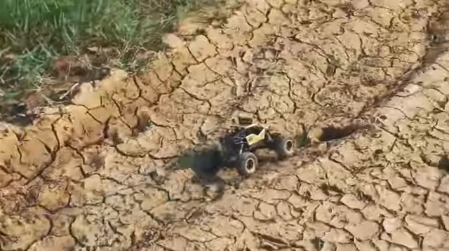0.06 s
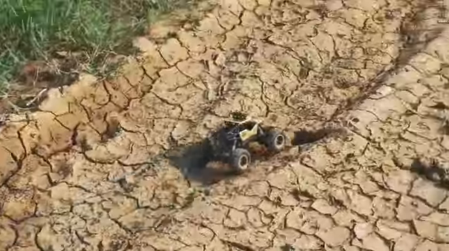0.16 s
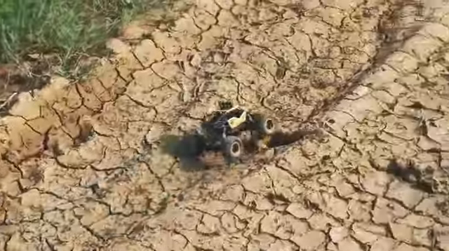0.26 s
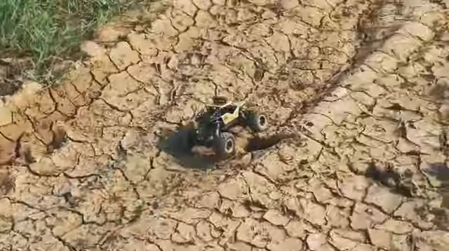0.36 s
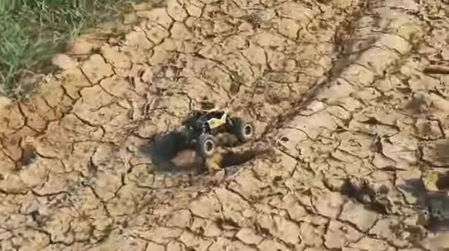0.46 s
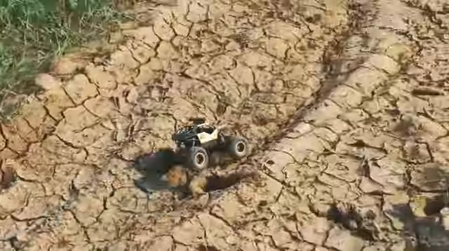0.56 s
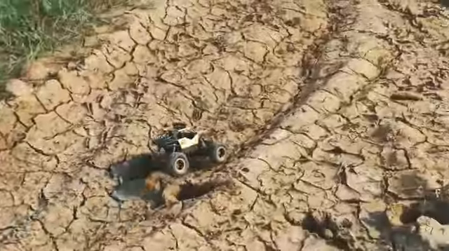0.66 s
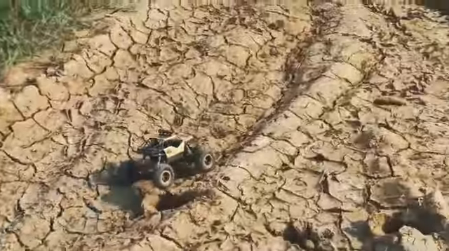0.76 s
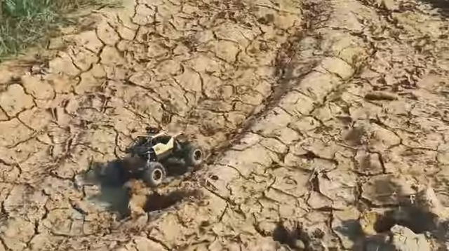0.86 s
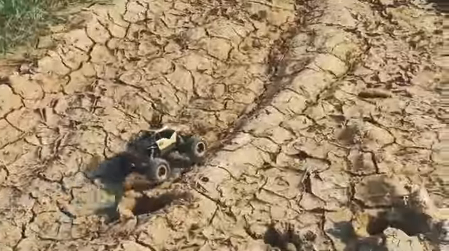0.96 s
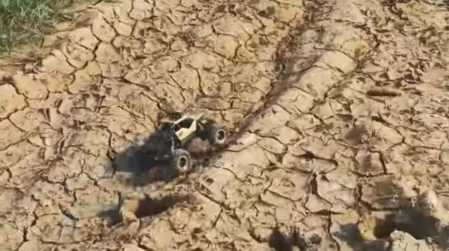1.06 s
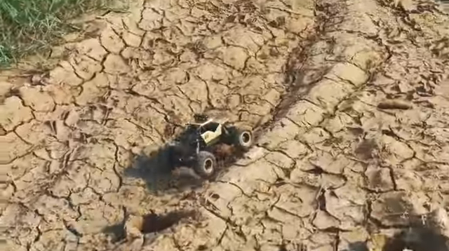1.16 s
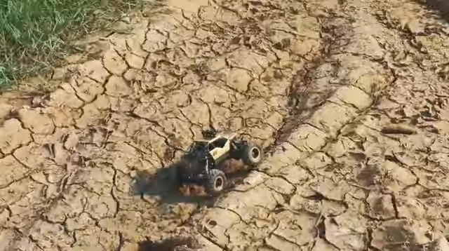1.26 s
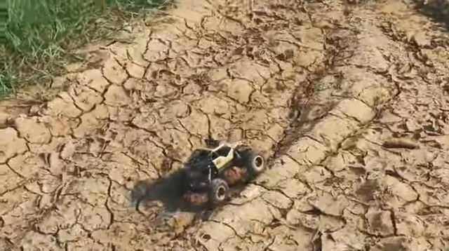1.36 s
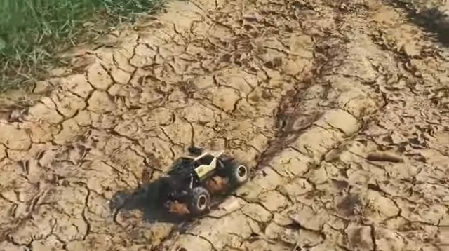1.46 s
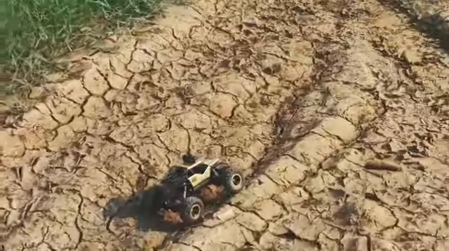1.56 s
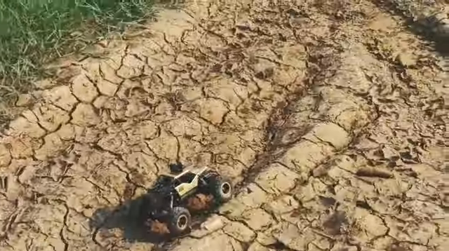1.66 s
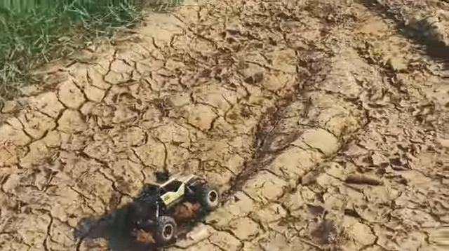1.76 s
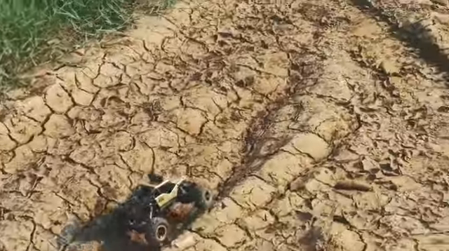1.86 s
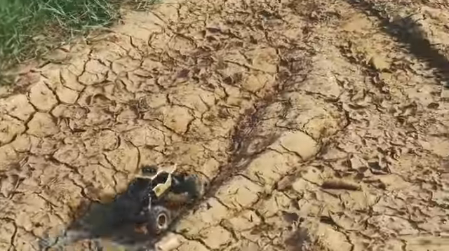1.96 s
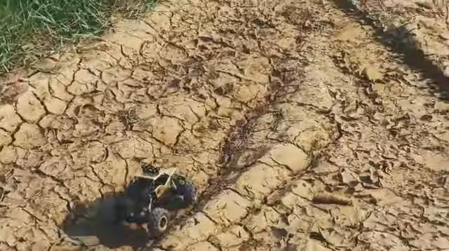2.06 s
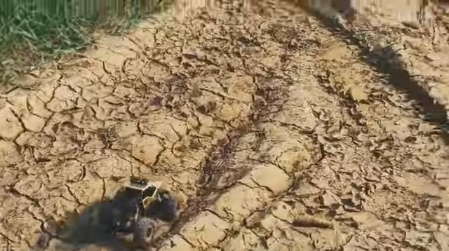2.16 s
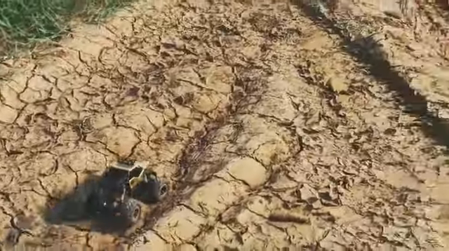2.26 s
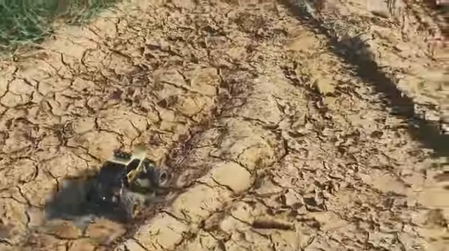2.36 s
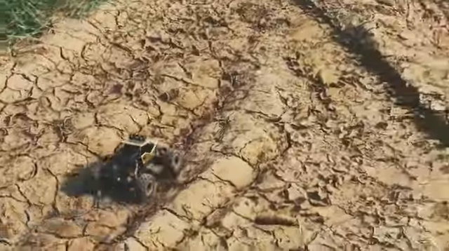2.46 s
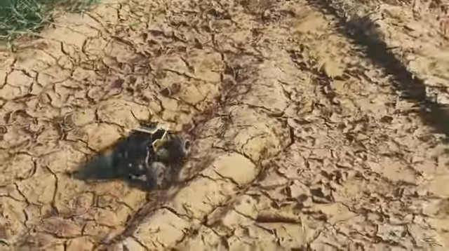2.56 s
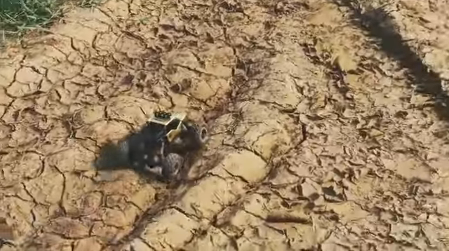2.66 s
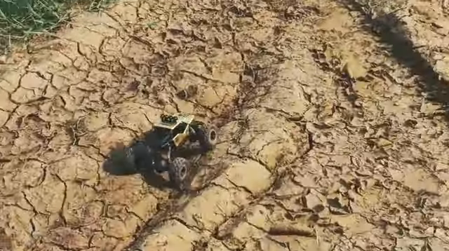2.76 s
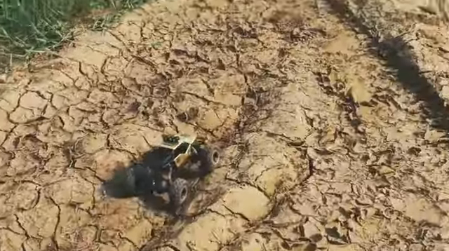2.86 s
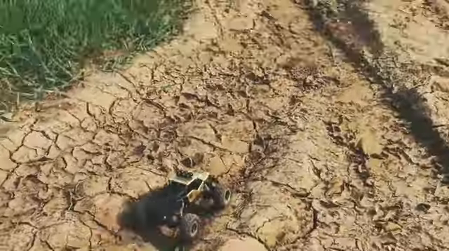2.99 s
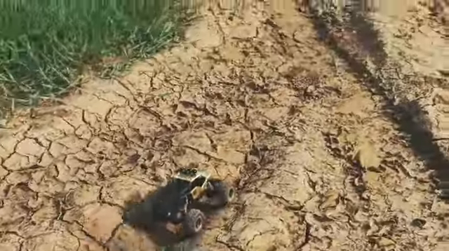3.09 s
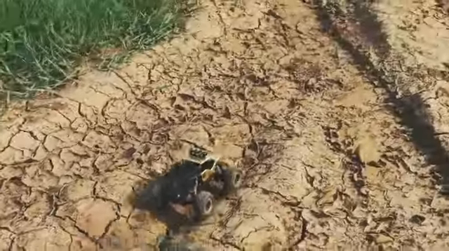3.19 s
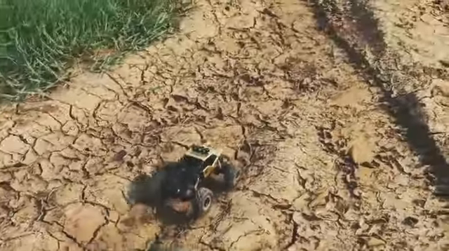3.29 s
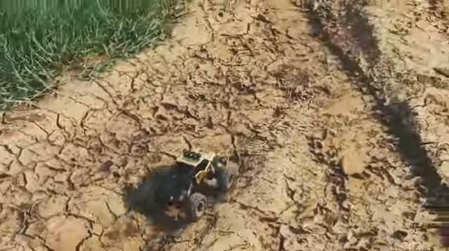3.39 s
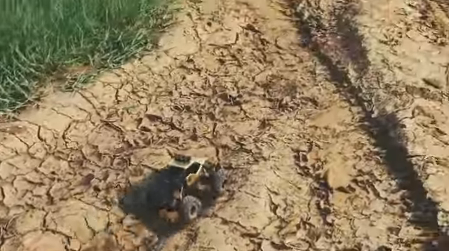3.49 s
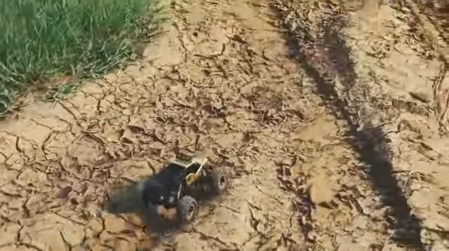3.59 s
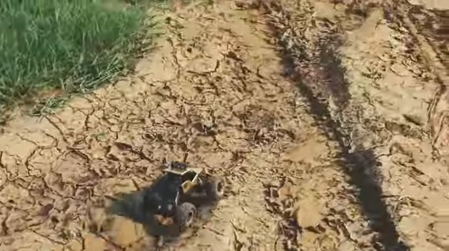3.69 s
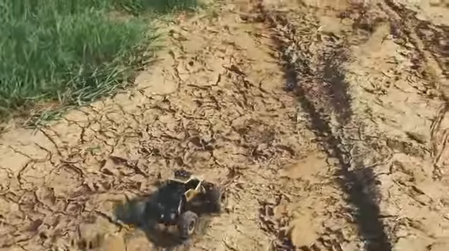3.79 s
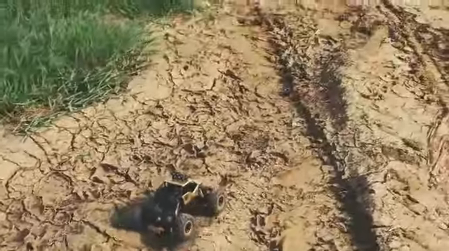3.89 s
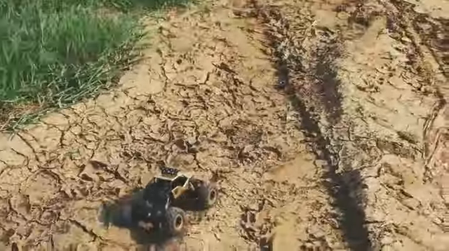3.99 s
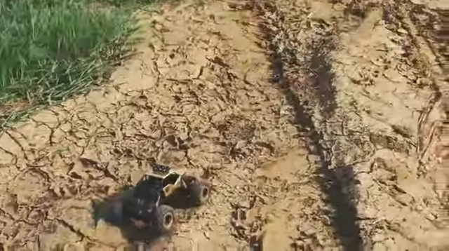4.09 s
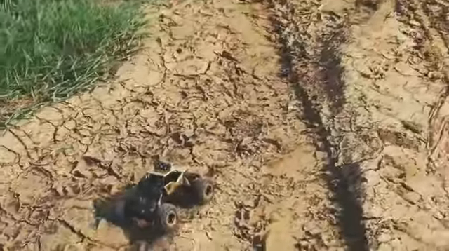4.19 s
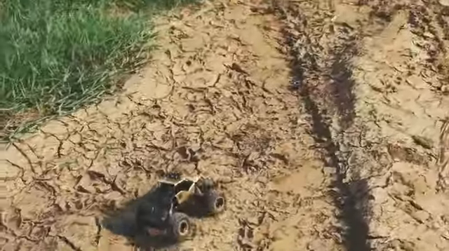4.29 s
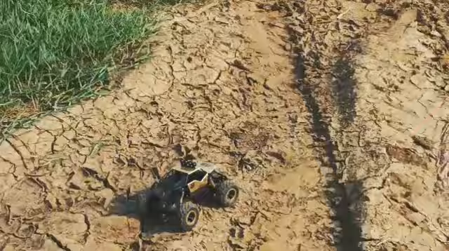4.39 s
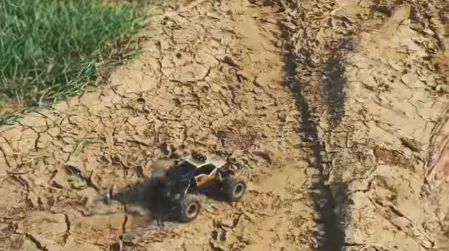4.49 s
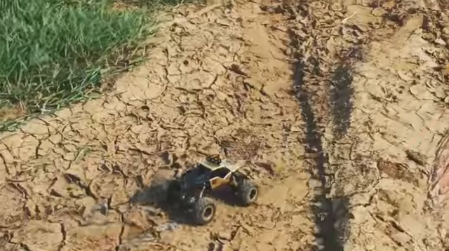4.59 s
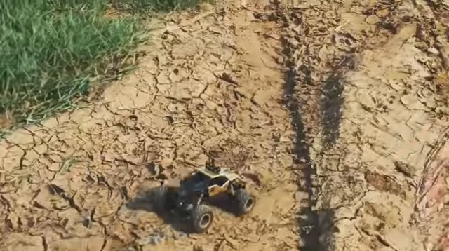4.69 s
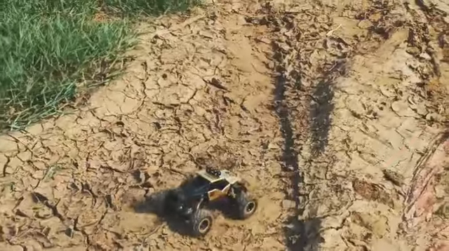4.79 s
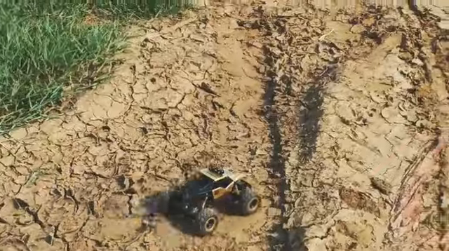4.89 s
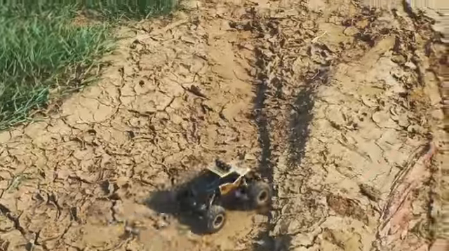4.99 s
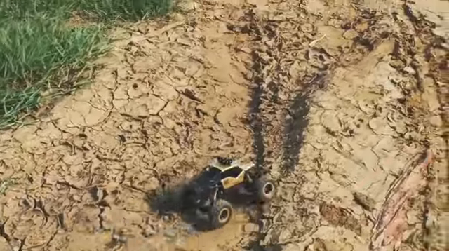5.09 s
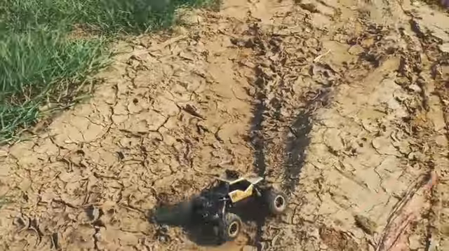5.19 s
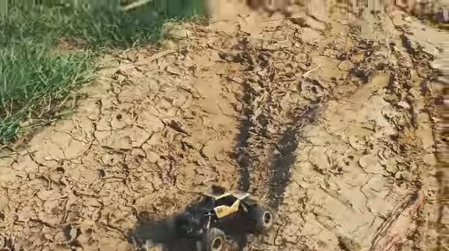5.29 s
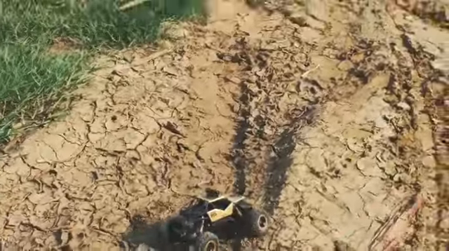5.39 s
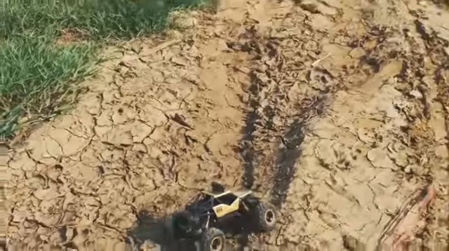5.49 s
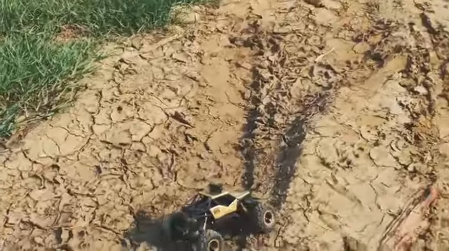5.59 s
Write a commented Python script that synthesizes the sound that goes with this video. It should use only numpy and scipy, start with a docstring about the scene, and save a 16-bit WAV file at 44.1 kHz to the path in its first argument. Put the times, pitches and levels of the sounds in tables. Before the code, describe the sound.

In quiet open air with no echo, a small toy truck starts with soft, dry plastic gear chatter, a brief whine and light shell knocks in the first half second. From 0.6 to 1.8 s there are weak, separated throttle pushes with faint crust clicks. At about 1.8 s the gears spin up again, stronger by 2.1 s, with a low tread groan, gritty scrubbing and a distinct crack near 2.4 s. Short bursts follow at 2.9 and 3.4 s, their mid-high whines gliding up and down, with snaps around 3 s and a rough rattle near 3.7 s. A low groan comes at 3.85 s. From 4.2 s the buzzing is loudest, grinding and shrill, with many snaps and hollow body knocks up to a hard clack at 5.15 s. One loud dull pop hits at 5.27 s, then a tiny hoarse skid, a thud and last small snaps.

```python
"""Plastic gears chatter first: a toy remote-control truck creeps in stop-start bursts over dry cracked mud.
The gears are motor ticks and random clicks ringing a case; short gliding tones make their whine.
The body shell is a set of resonances that rattles and knocks. The tyres are coloured clicks that scrub,
with dull bumps and a hoarse squeak. Crumbs of mud snap as short pulses with a bright crack.
Shaped noise makes a quiet open-air background."""
import sys
import numpy as np
from scipy import signal
from scipy.fft import rfft, irfft
from scipy.io import wavfile
from scipy.ndimage import uniform_filter1d

SR = 44100
rng = np.random.default_rng(int(sys.argv[2]) if len(sys.argv) > 2 else 0)


def dump(signal):
    """Clip the signal to [-1, 1] and save it as 16-bit WAV at the path in sys.argv[1]."""
    limited = np.clip(np.atleast_2d(signal).T, -1, 1)
    pcm = np.round(limited * 32767).astype(np.int16)
    wavfile.write(sys.argv[1], SR, pcm)


N = 249165

# Pushes of the throttle, from a creep to a lunge; the level is the gear drive at the start, before sag
# [start_s, length_s, spin_up_s, level_db]
THROTTLE_PUSHES = [(-.06, 0.42, 0.17, -45), (0.408, 0.2, 0.012, -51.5), (0.83, 0.22, 0.16, -45.5),
                   (1.061, 0.13, 0.038, -48.5), (1.207, 0.14, 0.018, -52.5), (1.798, 0.71, 0.13, -44.5),
                   (2.07, 0.38, .13, -38), (2.478, 0.031, 0.0038, -38.5), (2.903, 0.31, 0.12, -41.5),
                   (3.275, 0.027, 0.027, -48), (3.391, 0.45, 0.14, -40), (4.213, 0.25, 0.15, -35),
                   (4.552, 0.073, 0.0082, -46.5), (4.775, 0.4, 0.048, -36.5), (5.199, 0.066, 0.022, -44)]
COAST_S, SAG_DB_PER_S = 0.06, -9.5  # gears run down after each push, and ease off a little during it
IDLE_DB = -66  # gear drive while the truck barely rolls
MESH_TEETH = 4  # gear teeth that meet in one motor turn

# Gears bind under load and grind brightly [start_s, length_s, level_db]
GEAR_GRINDS = [(.212, 0.068, -54), (.32, 0.034, -49), (.378, 0.0094, -44), (.44, 0.038, -52.5),
               (.96, 0.067, -47), (1.9, 0.061, -51.5), (2.208, 0.025, -43), (3.44, 0.103, -50),
               (4.372, 0.091, -42), (4.825, 0.078, -45.5), (4.928, 0.039, -42.5), (5.035, 0.025, -40),
               (5.1, 0.019, -50)]
GRIND_ATTACK_S, GRIND_RELEASE_S = 0.0068, 0.0029

# Resonances, with levels relative to each other [pitch_hz, width_hz, level_db]:
# the gear case
CASE_MODES = [(1600, 240, 2), (2100, 58, 3.5), (2362, 225, 3), (2950, 94, 7), (3306, 87, 0),
              (3885, 154, -6), (5000, 350, -12.5)]
# the thin rasp of the teeth
RASP_MODES = [(7200, 2900, -3), (8650, 880, -12), (13600, 960, -7.5)]
# the strained gears
STRAIN_MODES = [(2740, 480, -7), (3900, 160, -2.5)]
# the higher shriek of gears that bind hard
SHRIEK_MODES = [(5030, 220, -1.5), (5470, 170, -1.5)]
# the body shell
SHELL_MODES = [(798, 70, 7), (934, 85, -2.5), (1320, 500, -10.5)]

# Gliding tones; the level is that of the main tone before its flutter
# [start_s, length_s, start_pitch_hz, end_pitch_hz, level_db]:
# the gear mesh sings for a moment
MESH_WHINES = [(0.214, 0.038, 2798, 2711, -48.5), (0.262, 0.019, 2860, 2558, -34),
               (0.649, 0.103, 2378, 2715, -56), (0.918, 0.0682, 2666, 3029, -47),
               (2.258, 0.039, 2618, 2413, -39), (2.321, 0.035, 2656, 2386, -33.5),
               (2.698, 0.0867, 2123, 2060, -51.5), (3.019, 0.062, 2768, 3257, -44),
               (3.088, 0.026, 4047, 3254, -42.5), (3.312, 0.022, 3005, 2300, -39),
               (3.424, 0.074, 2380, 3457, -39), (3.51, .026, 3592, 2500, -38),
               (3.769, 0.015, 3310, 2709, -34.5), (4.362, 0.078, 2616, 3733, -41),
               (4.432, 0.05, 2124, 2239, -40), (4.799, 0.034, 3056, 3450, -34),
               (4.857, 0.054, 4020, 4125, -40), (5.285, 0.05, 3302, 3128, -48),
               (5.56, 0.12, 2315, 2290, -56)]
# the tread judders on the crust with a low groan
TREAD_GROANS = [(2.0, 0.2174, 447.7, 386.7, -48), (3.835, 0.1116, 372, 452.5, -40)]
# a tyre skids with a hoarse, falling squeak
TYRE_SKIDS = [(5.415, 0.058, 1840, 1405, -48)]

# Rough patches that set the loose shell rattling [start_s, length_s, level_db]
SHELL_RATTLES = [(.212, 0.07, -39.5), (.44, 0.047, -41.5), (1.14, 0.053, -44), (1.915, 0.15, -50.5),
                 (2.225, 0.23, -45.5), (2.482, 0.14, -45.5), (2.785, 0.13, -54.5), (3.18, 0.13, -44),
                 (3.635, 0.044, -37), (3.732, 0.08, -38.5), (4.332, 0.032, -33.5), (4.468, 0.35, -43.5),
                 (4.925, 0.03, -33.5), (5.04, 0.048, -33.5), (5.145, 0.11, -37.5)]
RATTLE_ATTACK_S, RATTLE_RELEASE_S = 0.0036, 0.014
# A wheel slips and scrubs over the crust [start_s, length_s, level_db]
WHEEL_SCRUBS = [(2.15, 0.16, -45), (2.38, 0.06, -38.5), (3.17, 0.061, -44), (3.63, 0.34, -50),
                (4.32, 0.051, -45), (4.985, 0.036, -43.5), (5.14, 0.035, -50)]
SCRUB_ATTACK_S, SCRUB_RELEASE_S = 0.013, 0.012
SHELL_FOLLOW_DB, TYRE_FOLLOW_DB = -2.5, -14  # shell and tyres on even ground, relative to the gear drive
JUDDER_TYRE_DB = -11  # a rough patch also shakes the tyres, relative to the shell

# Jolts that ring the body shell [start_s, peak_db]
SHELL_JOLTS = [(.329, -26.5), (.343, -30), (.433, -33), (2.48, -30), (4.468, -23), (4.534, -28.5),
               (4.567, -28), (4.591, -23), (4.657, -28.5), (4.696, -29.5), (4.742, -24.5), (4.977, -17.5),
               (5.001, -22), (5.037, -29), (5.146, -26), (5.152, -13.5)]
# A soft tyre drops onto the crust [start_s, peak_db]
TYRE_THUDS = [(0.816, -41), (1.656, -42), (2.42, -39), (4.361, -35), (5.003, -28), (5.406, -35.5)]
# Dry snaps of mud crust and stones under the wheels; treble is the crack against the pulse, before CRACK_DB
# [start_s, peak_db, pitch_hz, treble_db]
CRUST_SNAPS = [(.577, -30, 890, -5.5), (0.818, -31.5, 1100, -19), (.842, -32.5, 1330, -24),
               (1.233, -33.5, 2080, 6), (1.46, -33, 1050, 7), (1.596, -36, 666, -23),
               (1.655, -32, 1470, -9), (2.423, -20, 416, 2), (2.905, -35, 1486, 13),
               (2.9807, -23.5, 840, -1), (2.9823, -27.5, 2000, -18), (3.194, -24, 805, 4),
               (3.96, -27.5, 482, -30), (4.339, -25, 904, -6), (4.3658, -19, 914, -3),
               (4.413, -20.5, 2347, -5), (4.569, -20.5, 2302, -14), (4.628, -24.5, 1768, -27),
               (5.2729, -7.5, 930, -27), (5.408, -31, 700, -12), (5.54, -25, 830, -2),
               (5.567, -29, 2470, -0.5)]
CRACK_DB = -3  # added to the treble level of every snap

# Spectra, as relative levels per Hz [pitch_hz, level_db]:
# tyres scrubbing
TYRE_SPECTRUM = [(40, -13.5), (160, -12.5), (265, 6), (330, 2.5), (430, 7.5), (520, 2), (620, -28),
                 (2500, -46.5)]
# grit ground under the tread
GRIT_SPECTRUM = [(500, -34), (2200, 4), (5500, -9.5), (6700, -25), (12000, -39)]
# open air
AIR_SPECTRUM = [(25, -16), (78, 3.5), (135, -2), (260, -0.5), (900, -7), (3200, -18), (7200, -39.5),
                (15500, -49.5)]
AIR_DB = -55.5  # rms level of the background
TOP_HZ = 15700  # upper limit of the whole sound


def drivetrain(drive, grind, rattle, scrub):
    """The motor ticks through loose gears that clatter, grind under load and shake the shell and tread."""
    ticks = unit(rotation(motor_speed(), jitter=.038) * undb(3 * walk(400)))
    teeth = ticks + undb(-2) * unit(clicks(rate=1400, spread_db=3.0))
    load = np.hypot(drive, grind)
    shell_gain = np.hypot(rattle, drive * undb(SHELL_FOLLOW_DB))
    tyre_gain = np.hypot(scrub, drive * undb(TYRE_FOLLOW_DB))
    mix = drive * undb(-2.6) * gear_chatter(teeth)
    mix += grind * strained_gears(teeth)
    mix += grind ** 1.523 * undb(14.0) * gear_shriek(teeth)  # jumps out in the hardest grinds
    mix += load ** 0.82 * undb(-39.5) * tooth_rasp(teeth)  # grows more slowly than the chatter
    mix += load * undb(-12.5) * ground_grit()
    mix += shell_gain * shell_rattle(ticks)
    mix += tyre_gain * tyre_scrub()
    # the cracked ground loads everything at once, and the slack gears catch and slip in coarse clumps
    bumps_db = 1.5 * walk(65) + 2.1 * walk(230)
    return undb(bumps_db) * mix


def throttle():
    """Gain of the gears: each push spins them up, sags and lets them coast back to idle."""
    t = np.arange(N) / SR
    pushes = []
    for s, length, spin_up, db in THROTTLE_PUSHES:
        sag_db = SAG_DB_PER_S * np.clip(t - s, 0, length)
        pushes.append(envelope(s, length, spin_up, COAST_S) * undb(db + sag_db))
    return np.hypot(np.max(pushes, axis=0), undb(IDLE_DB))


def motor_speed():
    """Turns per second: the motor passes through the speeds at which its gears sing, with a random wobble."""
    points = []
    for s, length, start_hz, end_hz, db in MESH_WHINES:
        points += [(s, start_hz), (s + length, end_hz)]
    mesh_hz = np.interp(np.arange(N) / SR, *np.transpose(sorted(points)))
    return mesh_hz / MESH_TEETH * np.exp(.025 * walk(40))


def rotation(hz, jitter):
    """One tick per turn of the motor; the speed shivers by the share jitter."""
    turns = np.cumsum(hz * (1 + jitter * walk(300))) / SR
    wrap = np.diff(np.floor(turns), prepend=0)
    early = wrap * np.clip(turns % 1 * SR / hz, 0, 1)  # each tick is shared between two samples
    return early + np.roll(wrap - early, 1)


def gear_chatter(teeth):
    """Tooth impacts ring the flexing plastic gear case."""
    case = flex(ring(teeth, CASE_MODES, swell_db=6.0, rate=50), depth=.025, rate=40)
    return steady(band(case, low_hz=1630, high_hz=5650, order=8))


def strained_gears(teeth):
    """Gears that bind under load ring at their own bright resonances."""
    strained = flex(ring(teeth, STRAIN_MODES, swell_db=4), depth=.03, rate=60)
    return steady(band(strained, low_hz=1800, high_hz=5850, order=8))


def gear_shriek(teeth):
    """Gears that bind hard excite higher resonances."""
    return steady(band(ring(teeth, SHRIEK_MODES, swell_db=4), low_hz=4400, high_hz=5900, order=6))


def tooth_rasp(teeth):
    """The same tooth impacts make a thin, high rasp."""
    return steady(band(ring(teeth, RASP_MODES, swell_db=4.5, rate=77), low_hz=5900, high_hz=12900, order=2))


def shell_rattle(ticks):
    """Motor ticks and random knocks shake the flexing body shell."""
    shaking = 0.27 * ticks + unit(clicks(rate=1100, spread_db=1.5))
    shell = flex(ring(shaking, SHELL_MODES, swell_db=3.0), depth=.055, rate=40)
    return steady(band(shell, low_hz=693, high_hz=1355, order=3))


def tyre_scrub():
    """Many small impacts of the tread on the crust, coloured by the tyres."""
    return steady(colour(clicks(rate=1300, spread_db=3.5), TYRE_SPECTRUM))


def ground_grit():
    """Uneven grains crunch under the tread."""
    return steady(colour(clicks(rate=1600, spread_db=6.0), GRIT_SPECTRUM))


def whines():
    """Gears sing as their teeth meet; when rising, uneven teeth add a line halfway between harmonics."""
    rising = [row for row in MESH_WHINES if row[3] > row[2]]
    falling = [row for row in MESH_WHINES if row[3] <= row[2]]
    rising_partials = [(.5, -6), (1, 0), (1.5, -18), (2, -24)]
    mesh = glides(rising, rising_partials, waver=.033, flutter_db=3)
    mesh += glides(falling, [(1, 0), (2, -16)], waver=.028, flutter_db=3.2)
    return band(mesh, low_hz=970, high_hz=5780, order=8)


def groans():
    """The tread sticks and slips on the crust: a low, rough tone with one overtone."""
    return glides(TREAD_GROANS, [(1, 0), (2, -10)], waver=.14, flutter_db=3.5)


def skids():
    """A sliding tyre squeaks: one hoarse tone that falls in pitch."""
    return glides(TYRE_SKIDS, [(1, 0)], waver=.07, flutter_db=1.2)


def jolts(tyre_hz=850, width_hz=320):
    """A wheel drops into a crack; the soft tyre rounds the blow, so the shell swells and rings briefly."""
    out = np.zeros(N)
    push = soft_blow(signal.unit_impulse(SR // 10), tyre_hz, width_hz)
    knock = ring(push, SHELL_MODES)
    for s, db in SHELL_JOLTS:
        add(out, s, peak_one(knock) * undb(db))
    return out


def thuds(body_hz=250, width_hz=170):
    """The hollow tyre gives a dull bump of a few cycles."""
    out = np.zeros(N)
    bump = soft_blow(signal.unit_impulse(SR // 20), body_hz, width_hz)
    for s, db in TYRE_THUDS:
        add(out, s, peak_one(bump) * undb(db))
    return out


def snaps(width_hz=680, tail_s=0.0084, tail_db=-33, crack_s=0.0018):
    """Crust breaks: a pulse of a few cycles, a bright crack of fresh noise and a little crumbling."""
    out, t = np.zeros(N), np.arange(SR // 20) / SR
    for s, db, hz, treble_db in CRUST_SNAPS:
        crumbling = undb(tail_db) * rng.standard_normal(len(t)) * np.exp(-t / tail_s)
        push = signal.unit_impulse(len(t)) + crumbling
        pop = band(soft_blow(push, hz, width_hz), low_hz=139, high_hz=3300, order=3)
        splinters = rng.standard_normal(len(t)) * np.exp(-t / crack_s)
        crack = band(splinters, low_hz=1940, high_hz=2920, order=1)
        crack = band(crack, low_hz=1450, high_hz=6430, order=9)
        snap = peak_one(pop) + undb(treble_db + CRACK_DB) * peak_one(crack)
        add(out, s, peak_one(snap) * undb(db))
    return out


def air():
    """Steady open-air background: noise shaped by a fixed spectrum."""
    return colour(rng.standard_normal(N), AIR_SPECTRUM) * undb(AIR_DB)


def glides(table, partials, waver, flutter_db):
    """Short gliding tones, rough in pitch and level; partials are (multiple, dB)."""
    out, drift, flutter = np.zeros(N), walk(650), walk(260)
    for s, length, start_hz, end_hz, db in table:
        n = max(int(length * SR), 8)
        i = np.minimum(int(s * SR) + np.arange(n), N - 1)
        hz = np.linspace(start_hz, end_hz, n) * (1 + waver * drift[i])
        phase = 2 * np.pi * np.cumsum(hz) / SR
        tone = sum(undb(partial_db) * np.sin(k * phase) for k, partial_db in partials)
        fade = signal.windows.tukey(n, .5)
        add(out, s, tone * fade * undb(db + flutter_db * flutter[i]))
    return out


def clicks(rate, spread_db):
    """Irregular tiny impacts of uneven size, on average rate per second."""
    hit = rng.random(N) < rate / SR
    size_db = spread_db * np.minimum(rng.exponential(size=N), 4)
    return hit * np.sign(rng.standard_normal(N)) * undb(size_db)


def resonate(x, hz, width):
    """One resonance, gain 1 at its centre."""
    return signal.lfilter(*signal.iirpeak(hz, hz / width, fs=SR), x)


def soft_blow(push, hz, width):
    """Two equal resonances in a row, so a sharp push swells before it dies away."""
    return resonate(resonate(push, hz, width), hz, width)


def ring(x, modes, swell_db=0, rate=35):
    """A body's resonances, driven together; as the load shifts each can swell on its own."""
    out = np.zeros(len(x))
    for hz, width, db in modes:
        swell = swell_db * walk(rate)[:len(x)]
        out += undb(db + swell) * resonate(x, hz, width)
    return out


def flex(x, depth, rate):
    """The plastic flexes under load, so its pitches waver by the share depth."""
    read_at = np.cumsum(1 + depth * walk(rate)) % N
    return np.interp(read_at, np.arange(N), x)


def band(x, low_hz, high_hz, order):
    """Keep the pitches between two limits; a higher order cuts more steeply."""
    return signal.sosfilt(signal.butter(order, [low_hz, high_hz], "band", fs=SR, output="sos"), x)


def colour(x, points):
    """Shape x with a spectrum of (Hz, dB) points, then scale to rms 1."""
    hz, db = np.transpose(points)
    f = np.maximum(np.fft.rfftfreq(N, 1 / SR), 1)
    gain = undb(np.interp(np.log(f), np.log(hz), db))
    return unit(irfft(rfft(x) * gain, N))


def steady(x, window_s=0.044):
    """Hold the short-term rms near 1, keeping the grain inside."""
    power = np.abs(uniform_filter1d(x ** 2, max(int(window_s * SR), 2)))
    return x / np.sqrt(power + 1e-3 * np.mean(x ** 2))  # the small floor avoids boosting silence


def envelope(s, length, attack_s, release_s):
    """Swell from time s, hold until the length is over, then die away."""
    t = np.arange(N) / SR - s
    return np.clip(t / attack_s, 0, 1) ** 2 * np.exp(-np.maximum(t - length, 0) / release_s)


def bouts(table, attack_s, release_s):
    """Gain of a series of short bouts with the same attack and release."""
    gains = [undb(db) * envelope(s, length, attack_s, release_s) for s, length, db in table]
    return np.max(gains, axis=0)


def walk(rate):
    """Slow chance: smoothed random levels, about rate new ones a second, with rms 1."""
    k = max(int(SR / rate), 1)
    steps = rng.standard_normal(N)[np.arange(N) // k]
    return unit(uniform_filter1d(steps, k))


def undb(db):
    """Decibels to gain."""
    return 10 ** (np.asarray(db) / 20)


def unit(x):
    """Scale to rms 1."""
    return x / np.sqrt(np.mean(x ** 2))


def peak_one(x):
    """Scale to peak 1."""
    return x / np.abs(x).max()


def add(out, s, x):
    """Mix x into out from time s."""
    i = max(int(s * SR), 0)
    out[i:i + len(x)] += x[:max(N - i, 0)]


def scene():
    """The truck on open ground, with no walls to echo it."""
    grind = bouts(GEAR_GRINDS, GRIND_ATTACK_S, GRIND_RELEASE_S)
    rattle = bouts(SHELL_RATTLES, RATTLE_ATTACK_S, RATTLE_RELEASE_S)
    slips = bouts(WHEEL_SCRUBS, SCRUB_ATTACK_S, SCRUB_RELEASE_S)
    scrub = np.hypot(slips, rattle * undb(JUDDER_TYRE_DB))
    truck = drivetrain(throttle(), grind, rattle, scrub) + whines() + groans() + skids()
    impacts = jolts() + thuds() + snaps()
    return (truck + impacts + air())[None]


def record(dry):
    """Cut the treble steeply above the top frequency."""
    return signal.sosfilt(signal.ellip(10, .2, 80, TOP_HZ, fs=SR, output="sos"), dry)


dry = scene()
out = record(dry)
dump(out)
```